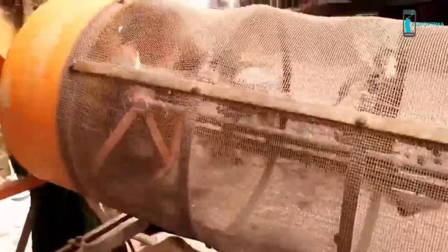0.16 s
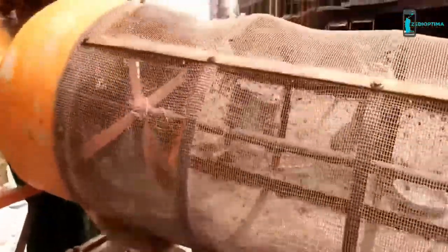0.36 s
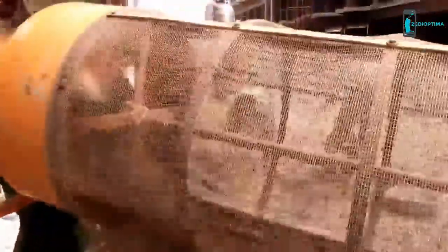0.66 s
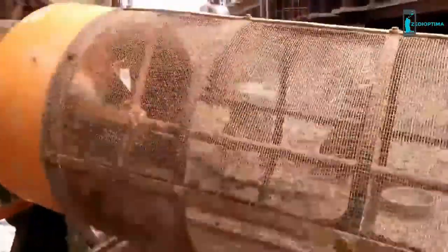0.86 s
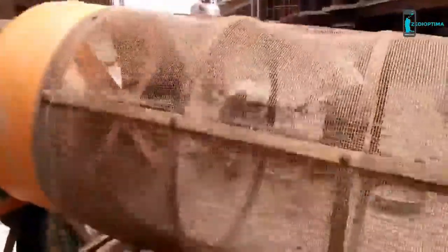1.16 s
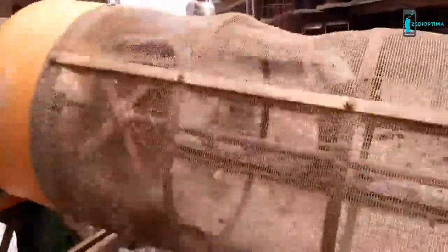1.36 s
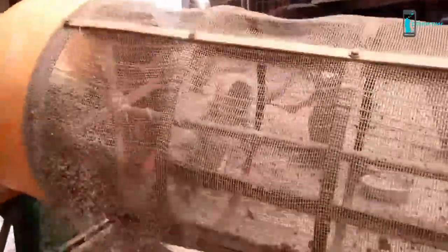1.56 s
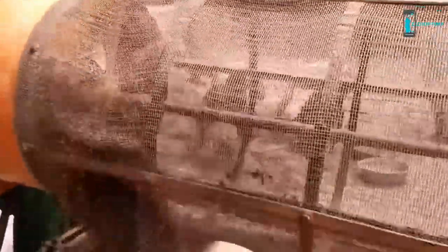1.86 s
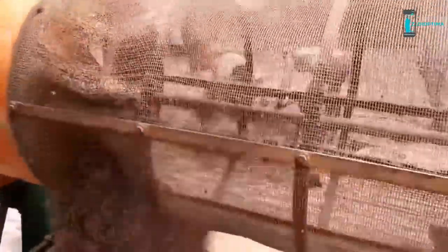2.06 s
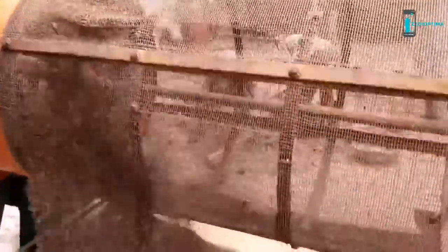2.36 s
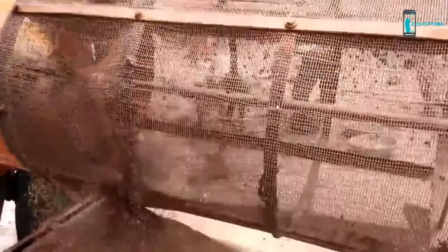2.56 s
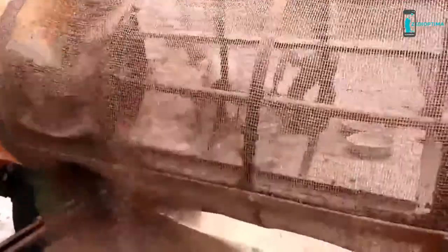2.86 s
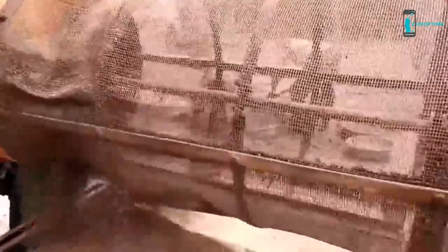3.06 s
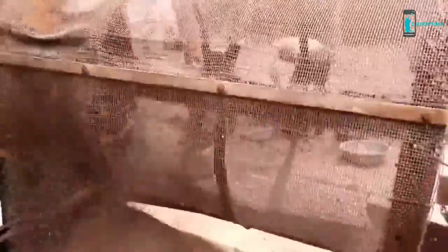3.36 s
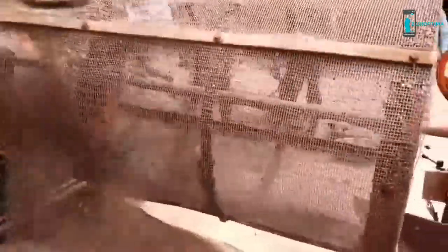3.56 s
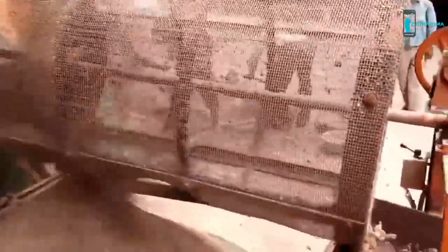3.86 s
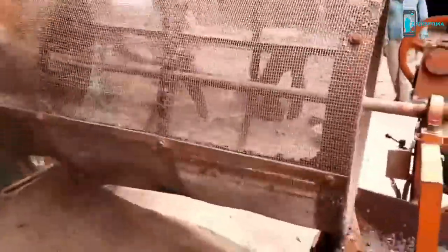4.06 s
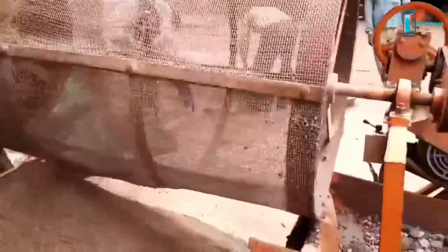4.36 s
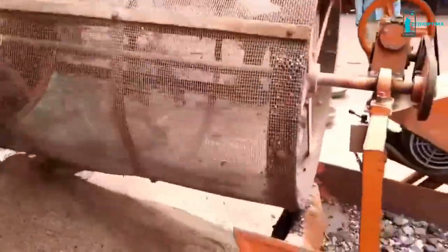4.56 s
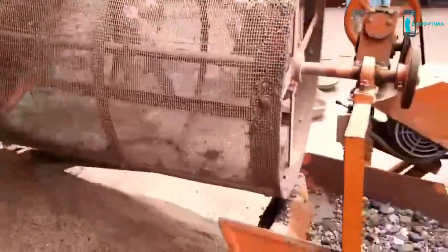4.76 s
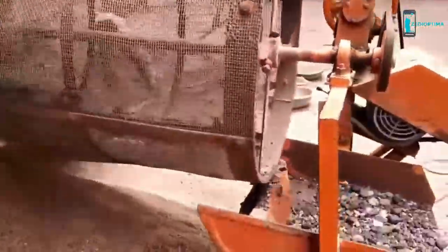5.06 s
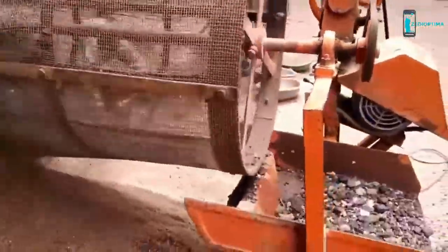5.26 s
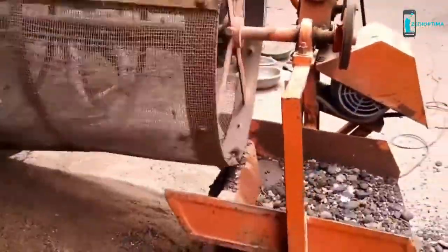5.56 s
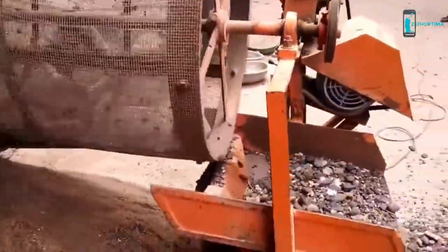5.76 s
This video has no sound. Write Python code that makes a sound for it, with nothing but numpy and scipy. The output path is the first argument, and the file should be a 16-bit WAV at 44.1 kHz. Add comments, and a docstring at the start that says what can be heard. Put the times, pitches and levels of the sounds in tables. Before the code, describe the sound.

A motor-driven wire-mesh drum turns outdoors, heard close on a phone in wide, dry stereo. From the start, sand rushes over the mesh in brief uneven surges, several per second, bright hiss joined by a grainy mid-range rumble. Pebbles crack, tick and chatter on steel almost continuously, with many sharp, very short hits. A weak, unsteady motor and frame hum sits underneath, swelling slightly under load. Wind slaps the right side around 0.6-1.0 s, then buffets both sides heavily from 1.4 to 1.9 s, with low flutter lingering past 2.4 s. A strong slide comes near 1.7-2.0 s, and hollow shell knocks ring around 1.96 s. From 2.5 to 4.1 s the wind is calm and the rattling clear, with another strong surge at 4.1 s. Gusts thump again at 4.2-4.7 s. Stones keep snapping, with another hollow knock near 5.5 s, as the tumbling continues to the end at about 6 s.

```python
"""Motor-driven sand sieve in gusty air

A motor turns a wire-mesh drum outdoors: sand hisses on the mesh as shaped noise, stones crack on the
steel as noise bursts and decaying modes, and the drive hums in narrow resonances of the frame.
Gusts buffet the two ports of a phone with low turbulence noise and single slaps. The phone ducks its gain
after loud sound and widens the image by subtracting a delayed copy of each port from the other."""
import sys
import numpy as np
from scipy import signal
from scipy.fft import rfft, irfft, next_fast_len
from scipy.io import wavfile
from scipy.ndimage import uniform_filter1d, map_coordinates

SR = 44100
rng = np.random.default_rng(int(sys.argv[2]) if len(sys.argv) > 2 else 0)


def generate_wav(sig):
    """Save sig (samples, or channels by samples) to the path in sys.argv[1] as 16-bit PCM at SR."""
    pcm = np.round(np.clip(np.atleast_2d(sig).T, -1, 1) * 32767).astype(np.int16)
    wavfile.write(sys.argv[1], SR, pcm)


N = 261072  # samples
# Levels in the tables are relative: later stages add their own gains.

# Spectrum of sand grains on the mesh: pitch_hz [Hz], level_db [dB]
SAND_SPECTRUM = [(2500, -31.5), (4000, -15.5), (5300, -9), (6500, -3.5), (8000, -3), (9500, 1.5),
                 (11000, -6), (12500, -16), (15000, -24)]
# Spectrum of the tumbling mass: pitch_hz [Hz], level_db [dB]
MASS_SPECTRUM = [(40, -13.5), (150, -10), (500, -6.5), (850, -11.5), (1300, -10.5), (2400, 0), (3000, 0.5),
                 (4000, -7.5), (5300, -15), (7000, -21.5)]


def load():
    """Granular noise: many small random impacts merge into the hiss of sand and the rumble of the mass."""
    sand_db, mass_db = sliding()
    surge = wobble(30)
    rattle = taps(70, spread_db=0.0, t60=0.12)
    grains = taps(1200, spread_db=5.0, t60=0.0091)
    bumps = taps(60, spread_db=-19, t60=0.049)
    sand = amp(sand_db - 3.5 + 1.4 * surge) * (0.79 + 0.33 * rattle + 0.36 * grains)
    mass = amp(mass_db - 4.0 + 2.03 * surge) * (0.97 + 0.024 * rattle + 0.019 * bumps)
    return coloured(sand, SAND_SPECTRUM, patchy_db=2.5) + coloured(mass, MASS_SPECTRUM, patchy_db=2.5)


# The load is lifted and slides down the mesh:
# start_s [s], length_s [s], sand_db [dB, sand hiss], mass_db [dB, tumbling mass]
SLIDES = [(0.0, 0.041, -29, -26.5), (0.1, 0.12, -34.5, -31.5), (0.27, 0.15, -28, -26.5),
          (0.47, 0.086, -30.5, -25), (0.56, 0.19, -33, -31), (0.79, 0.12, -28.5, -28),
          (0.93, 0.1, -38.5, -40), (1.1, 0.14, -39.5, -41), (1.3, 0.029, -41, -32.5),
          (1.47, 0.12, -28, -32.5), (1.72, .25, -25, -25), (2.06, 0.33, -37, -32.5),
          (2.44, 0.021, -29.5, -31.5), (2.55, 0.23, -43.5, -39), (2.87, 0.2, -30.5, -30.5),
          (3.15, 0.12, -27.5, -28.5), (3.25, 0.16, -33.5, -33.5), (3.515, 0.0088, -29.5, -31),
          (3.56, 0.21, -36, -39), (3.86, 0.057, -32.5, -29), (3.96, 0.085, -39, -33.5),
          (4.07, 0.1, -24, -24), (4.27, 0.043, -26.5, -29), (4.36, 0.22, -39.5, -37.5),
          (4.435, 0.0048, -37, -37), (4.68, 0.064, -40, -44), (4.83, 0.016, -38, -35.5),
          (4.9, 0.0088, -31, -37), (5.01, 0.043, -32.5, -31.5), (5.12, 0.18, -28, -26.5),
          (5.34, 0.08, -33, -31), (5.52, 0.059, -28.5, -32.5), (5.75, 0.042, -42, -51),
          (5.82, 0.13, -32.5, -51)]
TRICKLE_DB, ROLL_DB = -38.5, -37  # sand and mass between slides
SLIDE_RISE_DB_PER_S, SLIDE_FALL_DB_PER_S = 152, 162


def sliding():
    """Intermittent flow: the levels of sand and mass swell with each slide over a steady trickle."""
    return swells(SLIDES, [TRICKLE_DB, ROLL_DB], SLIDE_RISE_DB_PER_S, SLIDE_FALL_DB_PER_S)


TICK_DB, TICKS_PER_S = -12.5, 60  # rate for each mode in each train


def ticks():
    """Random point impacts: pebbles excite single mesh modes, in a common and a separate part."""
    size = (len(MESH_MODES), N)
    trains = []  # two independent trains: one in the part common to both ports, one in the separate part
    for _ in range(2):
        struck = rng.random(size) < TICKS_PER_S / SR
        strength = amp(2.5 * np.minimum(rng.exponential(size=size), 3))
        trains.append(pings(struck * strength))
    return amp(sliding()[0] + TICK_DB) * unit(np.array(trains))


# Modes of mesh and bars: pitch_hz [Hz], level_db [dB], t60_s [s]
MESH_MODES = [(3360, -4.5, 0.016), (4370, -8.5, 0.021), (6630, -5, 0.0065), (8800, 0, 0.018),
              (9430, 2.5, 0.014), (10150, 0.5, 0.018)]


def pings(blows):
    """Modal response: each mode's decaying sine is convolved with its own train of blows."""
    t = np.arange(SR // 20) / SR
    rings = [amp(db - 60 * t / t60) * np.sin(2 * np.pi * hz * t) for hz, db, t60 in MESH_MODES]
    return np.sum(signal.fftconvolve(blows, rings, axes=1), axis=0)[:N]


# Stones on the steel: start_s [s], level_db [dB],
# knock_db [dB re level_db, bar knock], thud_db [dB re level_db, drum thud]
STONES = [(0.0308, -20, -35, -29), (0.085, -16, -1, -22), (0.1158, -15.5, -11, -29),
          (0.251, -14.5, -20, -10), (0.3037, -10, -8, -14.5), (0.333, -8, -28, -44), (0.3815, -23, -13, -4),
          (0.4002, -14, -26, -6.5), (0.415, -6.5, -29, -31), (0.4557, -3.5, -4.5, -21),
          (0.491, -5, -14, -19), (0.586, -20, 3, -28), (0.601, -3.5, -12, -30), (0.604, -16, -12, -25),
          (0.805, -9.5, -6, -18), (0.838, -4.5, -18, -38), (0.841, -10.5, -14, -34),
          (0.921, -18.5, -22, -24), (0.956, -20, -20, -15), (1.057, -12, -13, -19.5),
          (1.098, -18, -26, -33), (1.126, -14.5, -8, -22), (1.2605, -17, -23, -18.5),
          (1.2965, -12.5, -8, -14), (1.3249, -17, -9, -22), (1.4618, -14.5, -20, -13),
          (1.5472, -4, -41, -47), (1.655, -12.5, -14, -13), (1.668, -13.5, -9, -14),
          (1.712, -4.5, -11, -39), (1.7205, -20, -19, -35), (1.745, -13, -17, -25), (1.7586, -4, -12, -27),
          (1.9414, -9, -18, -16.5), (1.9558, -2.5, -12.5, -17), (1.966, -7.5, -10, -31),
          (2.0145, -14, -19, -14), (2.0593, -13.5, -5.5, -19), (2.102, -13, -39, -14),
          (2.276, -12.5, -8, -55), (2.3146, -18, -16, -17), (2.397, -11, -38, -41),
          (2.412, -11.5, -6.5, -16), (2.424, -30, -20, -18), (2.4515, -12, -13, -18),
          (2.472, -7.5, -16, -29), (2.475, -17, -5, -35), (2.5563, -17, -9, -31), (2.61, -19, -9, -16),
          (2.6374, -17.5, -26, -51), (2.674, -19, -24, -29), (2.775, -11.5, -42, -21),
          (2.834, -16, -34, -43), (2.855, -5.5, -11, -46), (2.8918, -13, -16, -19), (3.052, -15, -48, -14),
          (3.1225, -11, -11, -22), (3.151, -13.5, -5, -41), (3.1755, -14, -16, -34),
          (3.179, -13.5, -5.5, -34), (3.3558, -24, -35, -23), (3.402, -6, -53, -29),
          (3.499, -11.5, -2.5, -58), (3.502, -9.5, -10, -47), (3.5122, -19, 1, -33),
          (3.7584, -16.5, -49, -50), (3.8112, -20, -14, -26), (3.8492, -14, -5, -28),
          (4.0123, -19, -18, -22), (4.085, -11, -35, -36), (4.0918, -11, -28, -32), (4.099, -19, -18, -31),
          (4.1897, -2.5, -52, -20), (4.2665, -15, -5, -20), (4.325, -15, -27, -19), (4.344, -15, -13, -21),
          (4.353, -14.5, -30, -29), (4.4263, -15.5, -10, -17), (4.5394, -6.5, -12, -21),
          (4.5802, -6.5, -12.5, -21), (4.685, -21.5, 3.5, -34), (4.7317, -14, -10, -30),
          (4.748, -17.5, -3, -29), (4.8208, -7, -2.5, -41), (4.8761, -15.5, -11, -47),
          (4.8872, -15, -7, -38), (4.8942, -6, -14, -46), (4.917, -7.5, -15, -43), (5.096, -13, -5, -27),
          (5.229, -3.5, -14, -26), (5.2325, -18, -18, -38), (5.236, -22, -14, -31), (5.245, -14, 1, -30),
          (5.4305, -12, -27, -31), (5.475, -20, -11, -23), (5.5045, -19, -26, -21),
          (5.533, -12.5, -26, -19), (5.5429, -4, -30, -26), (5.5817, -17, -6, -17), (5.609, -3, -11, -28),
          (5.757, -12.5, -10, -37), (5.764, -12, -12.5, -31), (5.772, -22, -7, -19),
          (5.843, -20.5, -1, -24), (5.9038, -10, -13, -29)]
# Spectrum of the steel bars: pitch_hz [Hz], level_db [dB]
BAR_SPECTRUM = [(500, -42), (1000, -31), (1600, -8), (2400, 6.5), (3000, 1.5), (4000, -2), (5300, 2),
                (7000, -37)]
# Spectrum of the broad crack on the shell, low body plus bright top: pitch_hz [Hz], level_db [dB]
SHELL_SPECTRUM = [(150, -14), (500, 3), (1000, 1), (1500, -16), (2500, 11)]
CHATTER_T60 = 0.038  # s, for the sand-coloured part; the bar and shell parts last longer
PING_DB, PING_SCATTER_DB = -11, 3


def stones():
    """Impact excitation: each stone gives a snap, a chatter of bounces, a mesh ping and a short frame ring."""
    t = np.arange(SR // 10) / SR
    shapes, ring, snap = np.zeros((3, N + SR)), np.zeros(N + SR), np.zeros(N)
    blows = np.zeros((len(MESH_MODES), N))
    low = np.transpose(MESH_MODES)[0] < 5000
    rise = 1 - np.exp(-t / 0.00096)
    scatter = PING_SCATTER_DB * rng.standard_normal((len(STONES), len(MESH_MODES)))
    for (s, db, knock_db, thud_db), uneven_db in zip(STONES, scatter):
        start = round(s * SR)
        parts = [(-5.5, 1), (knock_db - 5.5, 1.3), (thud_db - 0.5, 1.6)]  # level dB, times longer
        for part, (level_db, longer) in enumerate(parts):
            fall = amp(-60 * t / (CHATTER_T60 * longer)) + 0.41 * amp(-60 * t / 0.0074)
            shapes[part, start:][:len(t)] += amp(db + level_db) * fall * rise
        modes = sum(amp(rng.normal(0, 4.1)) * np.sin(2 * np.pi * hz * t)
                    for hz, _, _ in FRAME_RESONANCES if hz > 350)
        ring[start:][:len(t)] += amp(db + thud_db - 13.5 - 60 * t / 0.062) * rise * modes
        snap[start + 25] = amp(db - 20)
        # a harder bar knock also strengthens the low mesh modes
        blows[:, start + 20] = amp(db + PING_DB + uneven_db + low * (knock_db + 4.5))
    bounces = 0.67 + 0.17 * taps(600, spread_db=2.0, t60=0.00086)
    snap = filtered(snap, lambda hz: amp(along(SAND_SPECTRUM, hz)) + 0.5 * amp(along(BAR_SPECTRUM, hz)))
    spectra = [SAND_SPECTRUM, BAR_SPECTRUM, SHELL_SPECTRUM]
    chatter = sum(coloured(bounces * e[:N], c, patchy_db=1.4) for e, c in zip(shapes, spectra))
    return chatter + [ring[:N] + snap, pings(blows)]


# Heavy stones drop on the shell: start_s [s], level_db [dB], pitch_hz [Hz, favoured by the spot struck]
KNOCKS = [(0.279, -29, 610), (0.303, -27, 550), (0.461, -32.5, 634), (1.2979, -30, 556), (1.9555, -16, 805),
          (1.9668, -20, 340), (1.981, -33, 800), (2.0143, -31, 600), (2.104, -25, 746), (2.4236, -23, 380),
          (2.468, -29, 328), (3.12, -31, 653), (4.47, -34.5, 680), (5.27, -29, 335), (5.5436, -20.5, 1040)]
# Modes of the drum shell: pitch_hz [Hz], level_db [dB], t60_s [s]
SHELL_MODES = [(347, -4, 0.075), (392, 1, 0.039), (542, -4.5, 0.079), (597, -12.5, 0.11),
               (671, -13.5, 0.17), (797, -9.5, 0.12), (1036, -11.5, 0.1), (1400, -18, 0.041)]
FAVOUR_DB_PER_OCTAVE = 12


def knocks():
    """Modal selection: a push on the shell rings most the modes near the pitch that its spot favours."""
    ring, t = np.zeros(N + SR), np.arange(SR // 5) / SR
    for s, db, favoured_hz in KNOCKS:
        modes = 0
        for hz, mode_db, t60 in SHELL_MODES:
            off_db = FAVOUR_DB_PER_OCTAVE * abs(np.log2(hz / favoured_hz))
            level_db = mode_db + rng.normal(0, 0.87) - off_db
            modes = modes + amp(level_db - 60 * t / t60) * np.sin(2 * np.pi * hz * t)
        push = 0.54 * np.sin(2 * np.pi * favoured_hz * t) * amp(-60 * t / 0.016)
        ring[round(s * SR):][:len(t)] += amp(db) * (modes + push) * (1 - np.exp(-t / 0.00043))
    return np.array([ring[:N], 0 * ring[:N]])


# Frame resonances: pitch_hz [Hz], width_hz [Hz], level_db [dB rms of the hum]
FRAME_RESONANCES = [(59.6, 12, -54), (304.5, 21, -53.5), (402.3, 16, -59.5), (504.6, 9.7, -54.5),
                    (602.5, 28, -58), (695, 30, -60), (1077, 92, -57), (1409, 24, -61.5), (1570, 73, -58.5),
                    (1748, 70, -64.5)]
# The load drags on the frame and its upper resonances sing: start_s [s], length_s [s], boost_db [dB]
DRAGS = [(0.25, 0.067, 0), (0.38, 0.04, -4), (0.8, 0.06, 5.5), (1.8, 0.13, 8), (2.95, 0.097, 4.5),
         (3.86, 0.072, 11), (4.05, 0.11, 10), (5.12, 0.14, -11)]


def drive():
    """Resonance: motor and gears shake narrow bands of the frame, harder under load."""
    hums = np.zeros(N)
    drag_db, = swells(DRAGS, [0.0], 120, 120)
    for hz, width_hz, db in FRAME_RESONANCES:
        band = filtered(rng.standard_normal(N), lambda f: 1 / (1 + (2 * (f - hz) / width_hz) ** 2))
        hums += amp(db + drag_db * (hz > 900) + 2.1 * wobble(5.994)[0]) * unit(band)
    mass_db = sliding()[1]
    strain_db = 0.48 * (mass_db - mass_db.mean())
    return np.array([amp(-0.5 + strain_db) * hums, 0 * hums])


# Spells of wind on the ports: start_s [s], length_s [s], level_db [dB]
SPELLS = [(0.0, 0.022, -47), (0.3, .03, -48), (0.55, 0.068, -36), (0.71, .05, -35.5), (0.8, 0.1, -35),
          (0.95, 0.1, -31), (1.1, 0.09, -41.5), (1.29, 0.17, -35), (1.445, 0.11, -28), (1.65, 0.14, -25),
          (1.83, 0.14, -31), (2.05, 0.43, -35), (2.5, 0.056, -46), (3.11, 0.027, -50), (3.66, 0.039, -46),
          (4.14, 0.11, -40.5), (4.28, 0.068, -33.5), (4.39, 0.063, -29.5), (4.54, 0.028, -31),
          (4.64, 0.062, -40), (4.82, 0.025, -44), (5.565, 0.023, -45)]
# Air slaps, each on one port: start_s [s, peak], level_db [dB], pitch_hz [Hz], port [0 left, 1 right]
SLAPS = [(0.0115, -13, 247, 1), (0.589, -19, 200, 1), (0.602, -18, 161, 1), (0.617, -21, 260, 1),
         (0.704, -14, 200, 1), (0.7121, -11, 260, 1), (0.7175, -10, 300, 1), (0.726, -17, 201, 1),
         (0.74, -21, 150, 1), (0.785, -23, 173, 0), (0.854, -14, 280, 1), (0.861, -12.5, 217, 1),
         (0.876, -16, 172, 1), (0.953, -20, 245, 1), (0.97, -16, 146, 0), (1.001, -17, 203, 1),
         (1.011, -21, 260, 1), (1.03, -23, 160, 1), (1.372, -18, 147, 0), (1.435, -20, 202, 1),
         (1.451, -13, 262, 0), (1.461, -20, 230, 0), (1.474, -16, 170, 0), (1.496, -15, 248, 0),
         (1.5045, -8.5, 276, 0), (1.551, -20, 159, 0), (1.575, -14, 206, 1), (1.604, -20, 191, 1),
         (1.626, -18, 234, 1), (1.6578, -8, 238, 0), (1.68, -7.5, 283, 0), (1.7, -12, 218, 1),
         (1.708, -11, 230, 1), (1.723, -24, 221, 1), (1.751, -15, 220, 1), (1.76, -8.5, 267, 1),
         (1.771, -12, 350, 1), (1.855, -18, 145, 0), (1.888, -11, 175, 1), (1.906, -12, 162, 1),
         (1.927, -13, 169, 1), (2.12, -22, 142, 1), (2.14, -26, 164, 0), (2.194, -18, 308, 0),
         (2.236, -20, 187, 0), (2.379, -20, 176, 1), (4.219, -21, 120, 0), (4.245, -19, 196, 0),
         (4.306, -16, 260, 1), (4.321, -19, 300, 0), (4.329, -14, 300, 1), (4.337, -17, 330, 1),
         (4.348, -18, 280, 1), (4.364, -18, 202, 1), (4.386, -29, 123, 0), (4.405, -16, 138, 0),
         (4.435, -12, 274, 0), (4.547, -17, 99, 0), (4.577, -15, 110, 0), (4.675, -24, 110, 0)]
# Spectrum of the buffeting: pitch_hz [Hz], level_db [dB]
BUFFET_SPECTRUM = [(20, -1), (60, 1.5), (120, -2), (250, -11), (500, -19), (900, -30.5), (2000, -67)]
CALM_DB, WIND_RISE_DB_PER_S, WIND_FALL_DB_PER_S = -62, 294, 246
SLAP_CYCLES, SLAP_TAIL_CYCLES = 0.2, 0.6  # half width before and after the peak


def wind():
    """Turbulent pressure, different at each port: a lumpy rumble, small kicks and single slaps."""
    lumps = unit(amp(1.2 * wobble(25, channels=2) + 0.26 * wobble(20)))
    buffet_db, = swells(SPELLS, [CALM_DB], WIND_RISE_DB_PER_S, WIND_FALL_DB_PER_S)
    envelope = amp(buffet_db + 0.5) * lumps
    t, slaps = np.arange(-SR // 100, SR // 25) / SR, np.zeros((2, N + SR))
    for s, db, hz, port in SLAPS:
        cycles, start = hz * t, round(s * SR) - SR // 100
        width = np.where(t < 0, SLAP_CYCLES, SLAP_TAIL_CYCLES)
        bell = np.exp(-(cycles / width) ** 2 / 2)
        wave = np.cos(2 * np.pi * cycles + rng.normal(0.4, 0.25))
        slaps[int(port), start:start + len(t)] += rng.choice([-1, 1]) * amp(db) * bell * wave
    kicks = (rng.random((2, N)) < 45 / SR) * rng.standard_normal((2, N))
    kicks = unit(filtered(kicks, lambda hz: amp(along(BUFFET_SPECTRUM, hz)) * (1 + hz / 300)))
    rumble = coloured(envelope, BUFFET_SPECTRUM, patchy_db=1.7)
    return 1.06 * rumble + 0.38 * envelope * kicks + slaps[:, :N]


# Likeness of the sound at the two ports: pitch_hz [Hz], likeness [0-1]
LIKENESS = [(100, 1), (1300, 0.74), (1900, 0), (3500, 0), (5500, 0.15), (7000, 0.15), (10000, 0.12),
            (14000, 0.2)]
# Left port against right: pitch_hz [Hz], level_db [dB]
SHADOW = [(300, -0.5), (600, 1.5), (5000, -4.5), (7000, -4), (8200, -4.5), (9500, -12), (11500, -9),
          (14000, -2)]
# The left port hears later: pitch_hz [Hz], delay_s [s]
LAG = [(1300, 0.000058), (2000, 0.00017), (6000, 0.0002734)]


def ports(pair):
    """Partial coherence: both ports share a common and a separate part; the left is farther and shaded."""
    def turn(hz):
        return np.arccos(np.clip(along(LIKENESS, hz), 0, 1)) / 2

    common, apart = filtered(pair, lambda hz: np.array([np.cos(turn(hz)), np.sin(turn(hz))]))
    left = filtered(common + apart, lambda hz: amp(along(SHADOW, hz)) * delayed(LAG, hz))
    return np.array([left, common - apart])


def amp(db):
    """Decibel law: the amplitude gain of a level."""
    return 10 ** (np.asarray(db) / 20)


def unit(x):
    """Normalisation: x scaled to rms 1."""
    return x / np.sqrt(np.mean(x ** 2) + 1e-20)


def along(points, hz):
    """Logarithmic frequency scale: interpolates (Hz, value) points."""
    f, v = np.transpose(points)
    return np.interp(np.log(hz + 1), np.log(f + 1), v)


def delayed(points, hz):
    """Phase delay: the response of a delay in seconds that varies with frequency."""
    return np.exp(-2j * np.pi * hz * along(points, hz))


def wobble(rate, channels=1):
    """Slow random modulation: smooth curves with rate knots a second."""
    knots = rng.standard_normal((channels, int(N * rate / SR) + 4))
    return np.array([map_coordinates(k, [np.arange(N) * rate / SR]) for k in knots])


def filtered(x, response):
    """Linear filtering: the spectrum of x times a complex response of frequency."""
    m = next_fast_len(N + 8192)
    return irfft(rfft(x, m) * response(np.fft.rfftfreq(m, 1 / SR)), m)[..., :N]


def coloured(envelope, spectrum, patchy_db):
    """Shaped noise: two noises with patches of random gain; the spectrum is scaled to mean power 1."""
    z = signal.stft(rng.standard_normal((2, N)), nperseg=256)[2]
    field = uniform_filter1d(rng.standard_normal(z.shape[1:]), size=4, axis=0)
    field = uniform_filter1d(field, size=7, axis=1)
    patchy = signal.istft(z * amp(patchy_db * unit(field)), nperseg=256)[1][:, :N]
    noise = envelope * unit(patchy)
    power = np.mean(amp(along(spectrum, np.linspace(0, SR / 2, num=2000))) ** 2)
    return filtered(noise, lambda hz: amp(along(spectrum, hz)) / np.sqrt(power))


def taps(per_s, spread_db, t60):
    """Shot noise: an envelope of rms 1 from random contacts of random size, each dying in t60 seconds."""
    chance, size = rng.random(N), rng.exponential(size=N)
    strikes = (chance < per_s / SR) * amp(spread_db * np.minimum(size, 4))
    return unit(signal.lfilter([1], [1, -amp(-60 / (t60 * SR))], strikes))


def swells(rows, rest_db, rise, fall):
    """Power addition: each row climbs to its start, holds and falls, in dB/s, over a resting level in dB."""
    s, length, *levels = np.transpose(rows)[..., None]
    t = np.arange(0, N, 64) / SR
    away_db = rise * np.maximum(s - t, 0) + fall * np.maximum(t - s - np.abs(length), 0)
    curves = []
    for db, rest in zip(levels, rest_db):
        power = np.sum(amp(db - away_db) ** 2, axis=0) + amp(rest) ** 2
        curves.append(np.interp(np.arange(N) / SR, t, 10 * np.log10(power)))
    return curves


def scene():
    """Superposition: drum and drive reach the ports through the air, and the wind acts right on them."""
    return ports(amp(3.5) * (load() + ticks() + stones() + knocks() + drive())) + wind()


def ducked(x, knee_db, depth, attack_s, release_s):
    """Gain control: the level, followed late and let go slowly, turns the gain down."""
    level = np.mean(x ** 2, axis=0)
    for seconds in attack_s, release_s:
        keep = np.exp(-1 / (seconds * SR))
        level = signal.lfilter([1 - keep], [1, -keep], level)
    return x * (1 + level / amp(knee_db) ** 2) ** -depth


# Share of the other port taken off: pitch_hz [Hz], share [0-1]
WIDEN_SHARE = [(60, 0.69), (1300, 0.59), (2650, 0.88), (4000, 0.67), (5300, 0.81), (6600, 0.2), (8000, 0.1),
               (9400, 0.11), (12000, 0.08)]
# Delay of that copy: pitch_hz [Hz], delay_s [s]
WIDEN_DELAY = [(1300, 0.00038), (2500, 0.0004016), (4000, 0.00037), (5300, 0.000376), (9400, 0.0003704)]
TOP_HZ = 15300


def record(dry):
    """Signal chain: gain control, widening by crossed subtraction, soft clipping and a band limit."""
    x = ducked(dry, knee_db=-24.0, depth=0.25, attack_s=0.018, release_s=0.038)
    cross = filtered(x[::-1], lambda hz: np.clip(along(WIDEN_SHARE, hz), 0, 1) * delayed(WIDEN_DELAY, hz))
    wide = x - cross
    clipped = wide / (1 + np.abs(wide / 0.95) ** 4) ** 0.25
    return filtered(clipped, lambda hz: 1 / (1 + (hz / TOP_HZ) ** 80) * (hz < 16500))


dry = scene()
out = record(dry)
generate_wav(out)
```